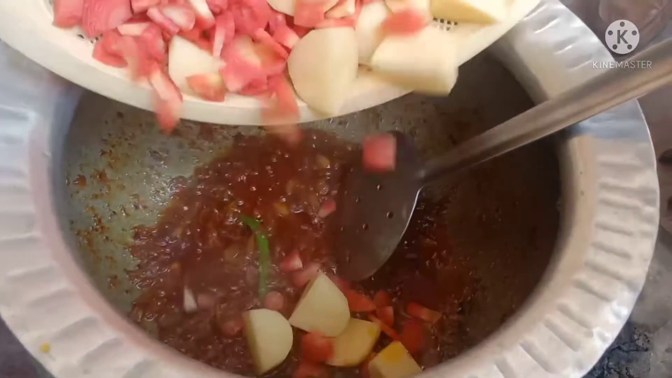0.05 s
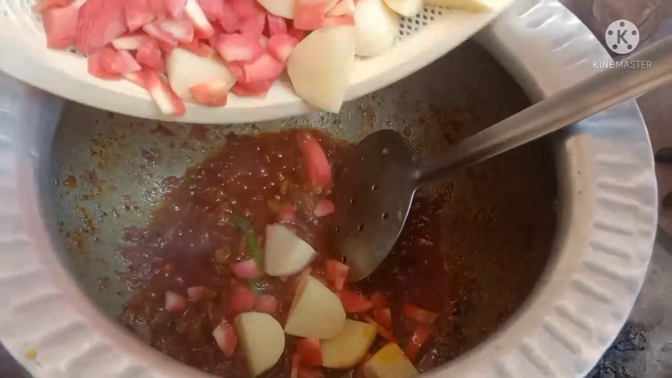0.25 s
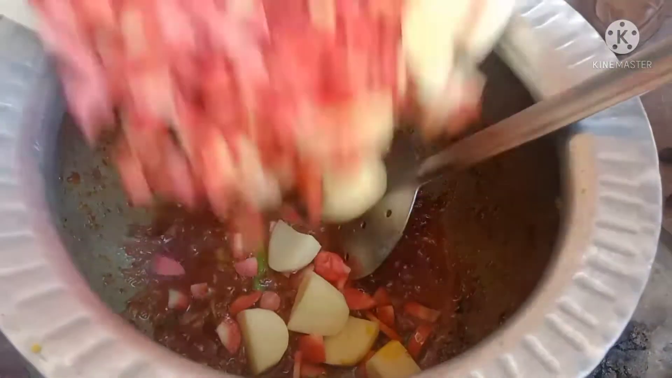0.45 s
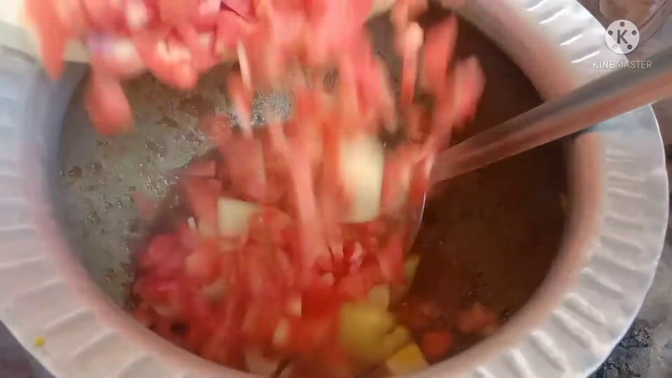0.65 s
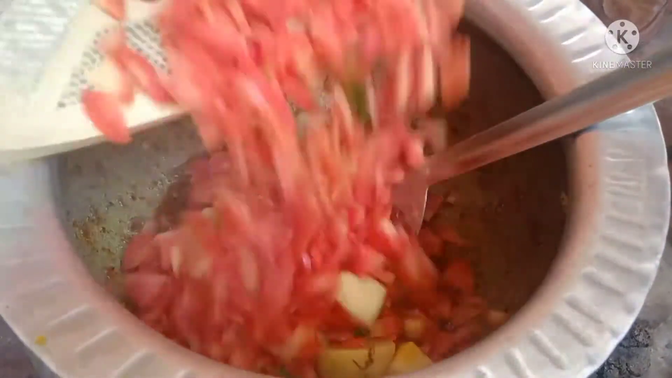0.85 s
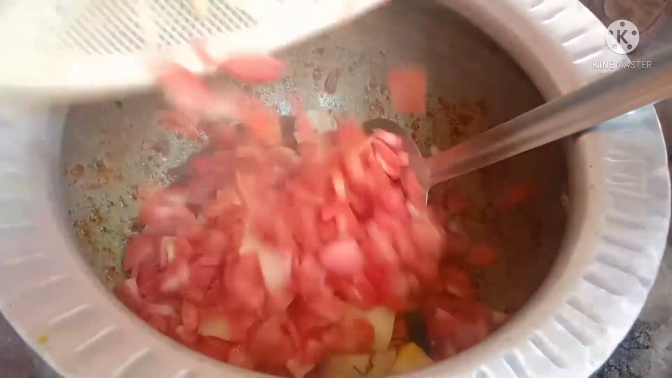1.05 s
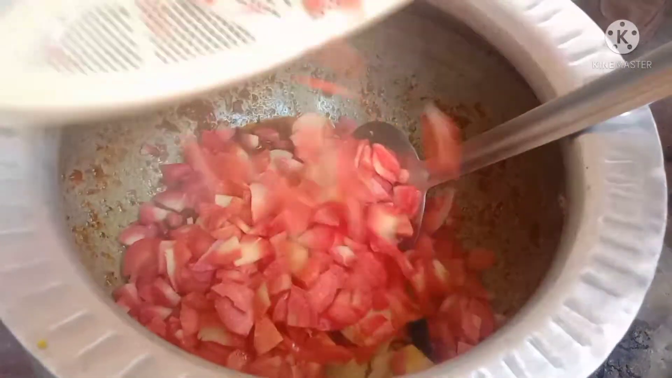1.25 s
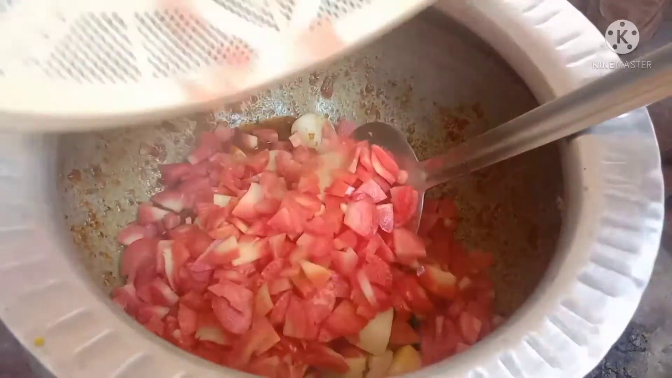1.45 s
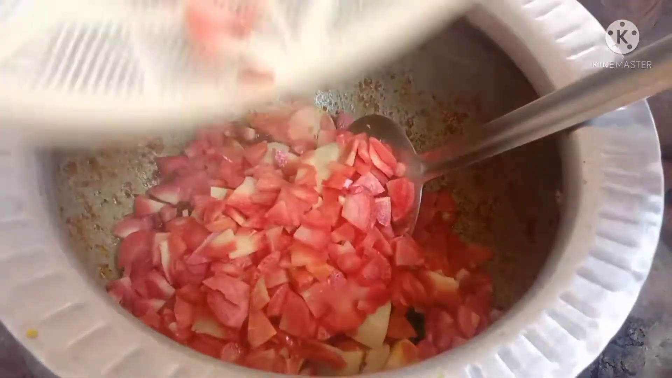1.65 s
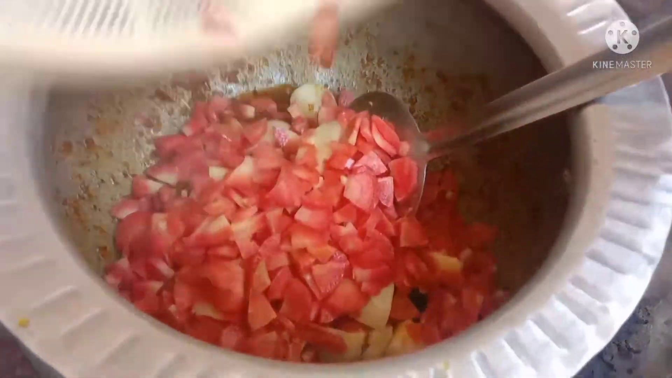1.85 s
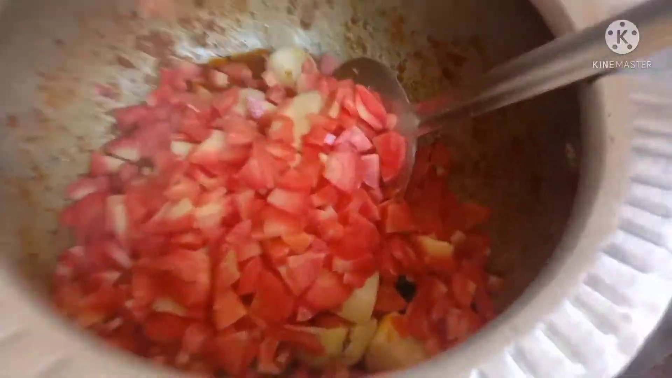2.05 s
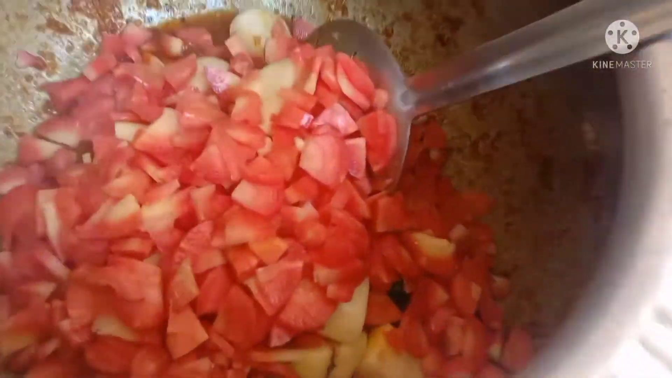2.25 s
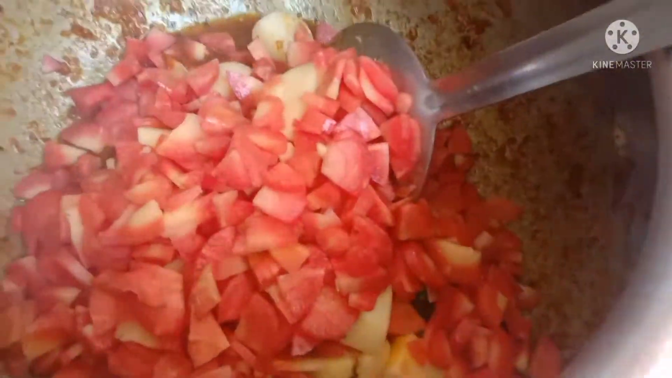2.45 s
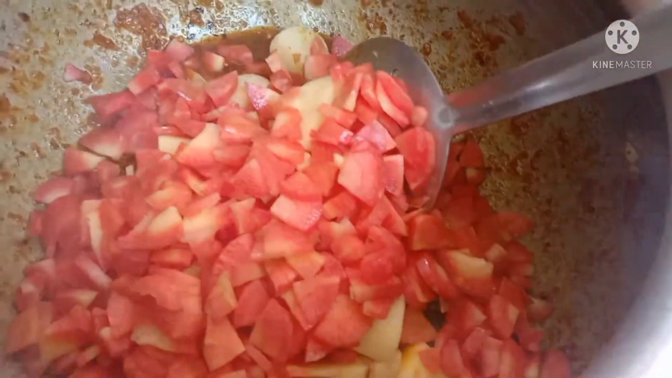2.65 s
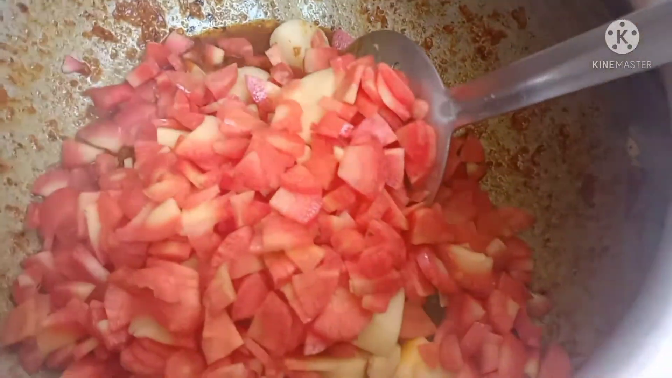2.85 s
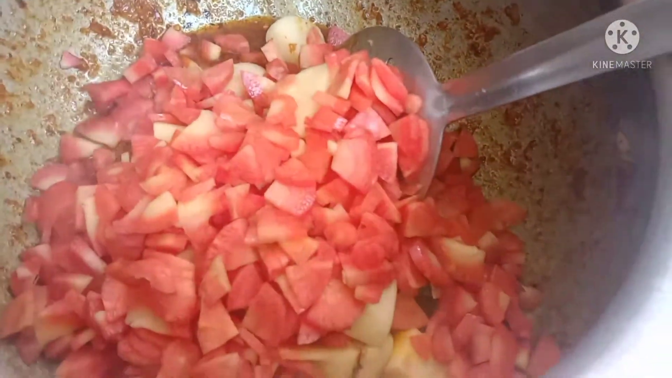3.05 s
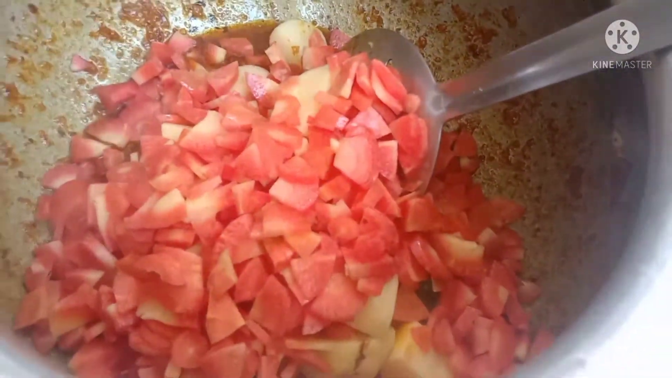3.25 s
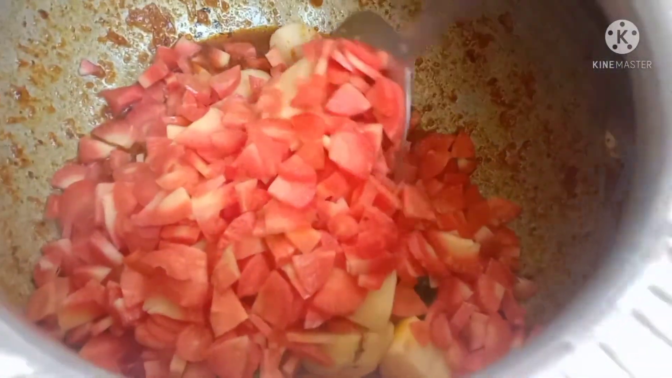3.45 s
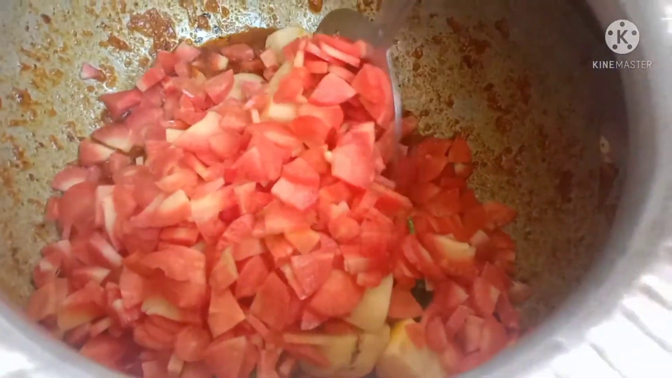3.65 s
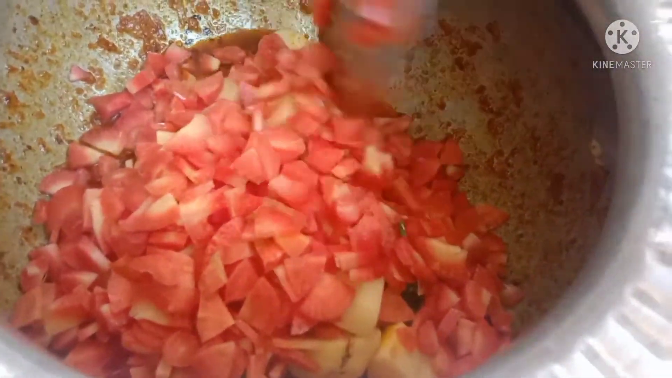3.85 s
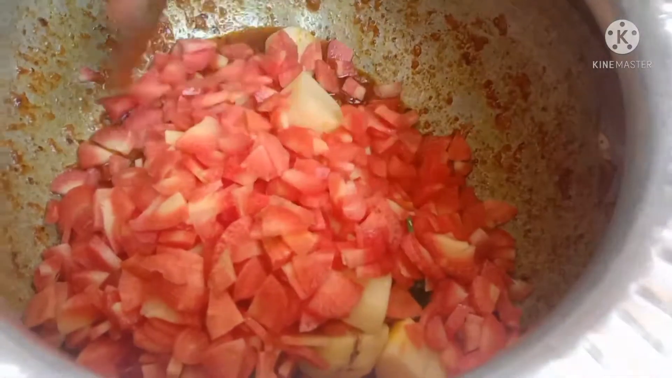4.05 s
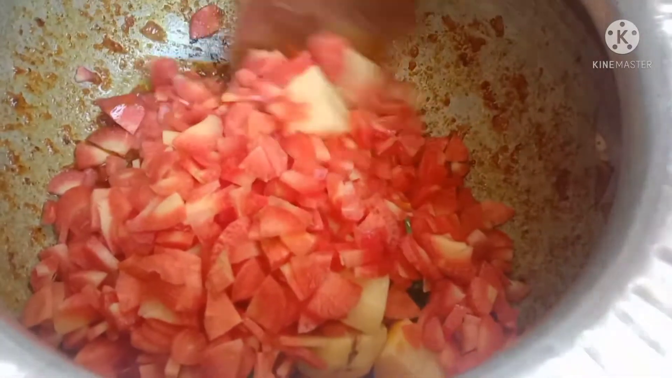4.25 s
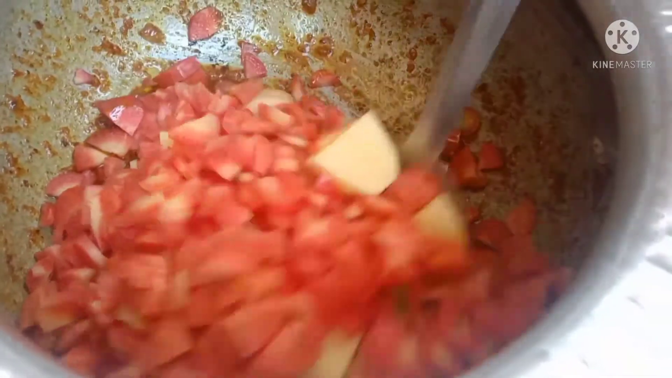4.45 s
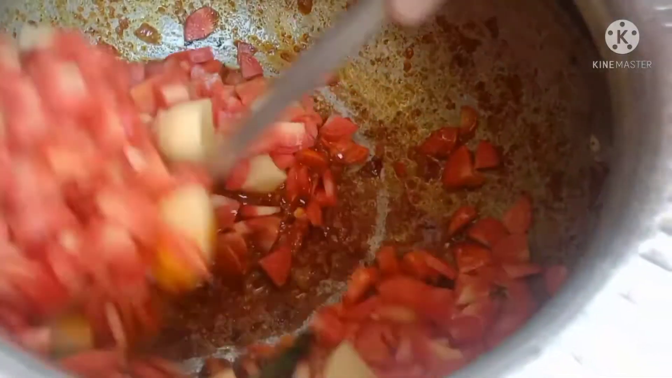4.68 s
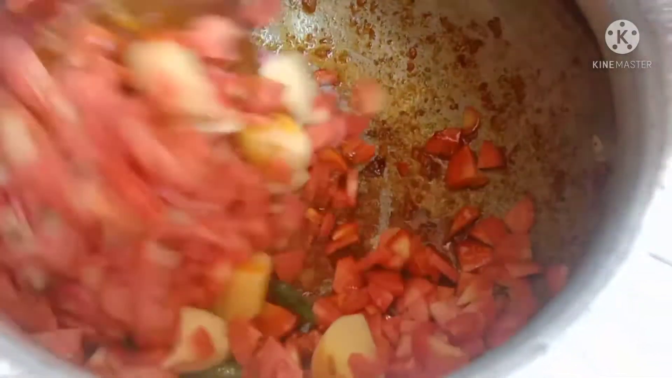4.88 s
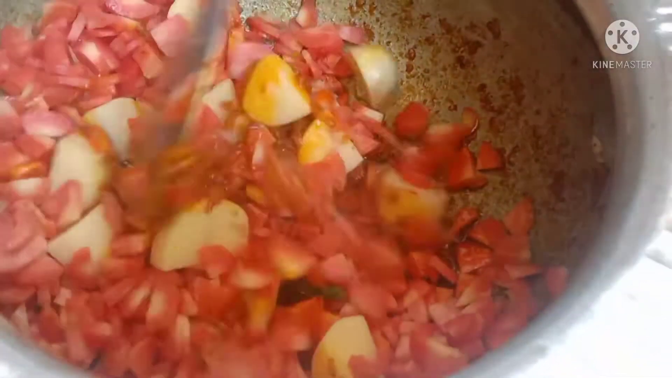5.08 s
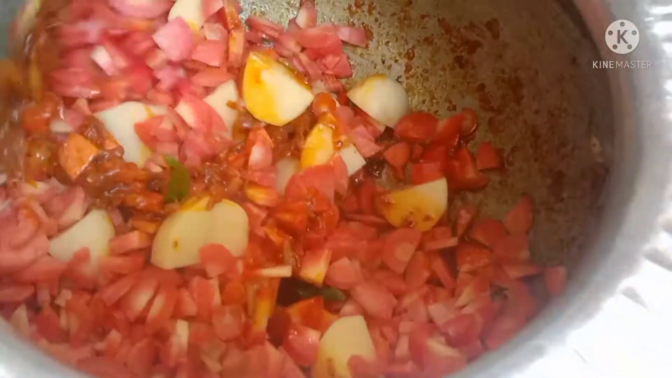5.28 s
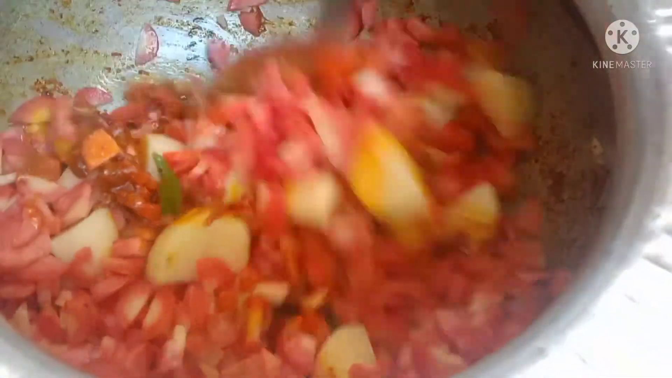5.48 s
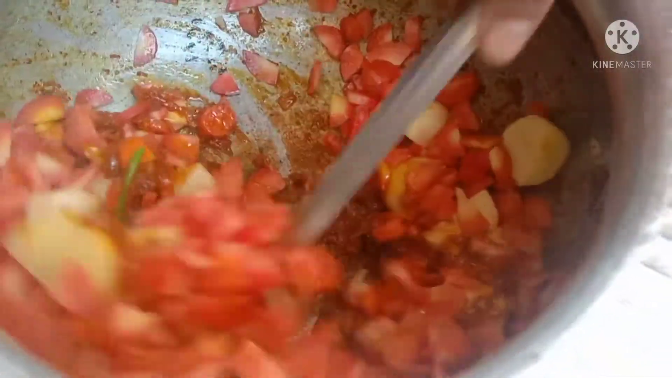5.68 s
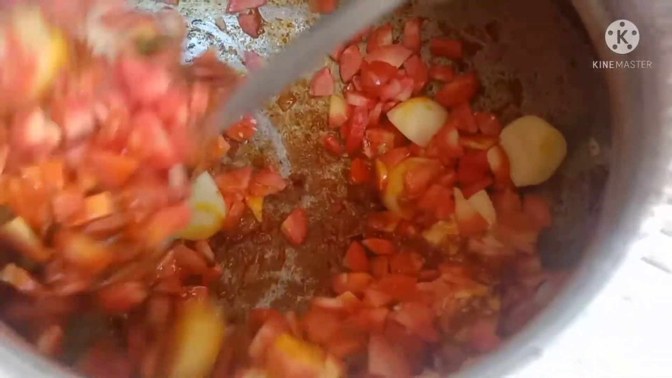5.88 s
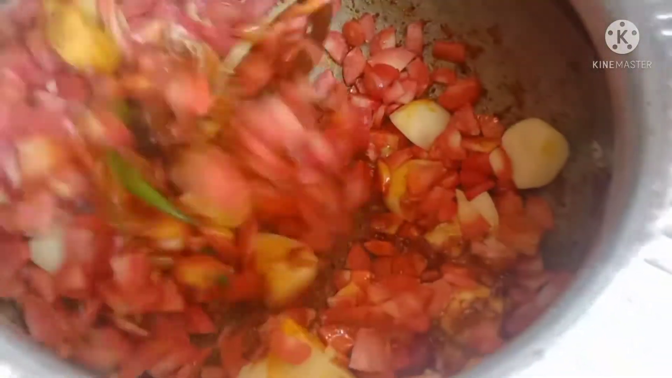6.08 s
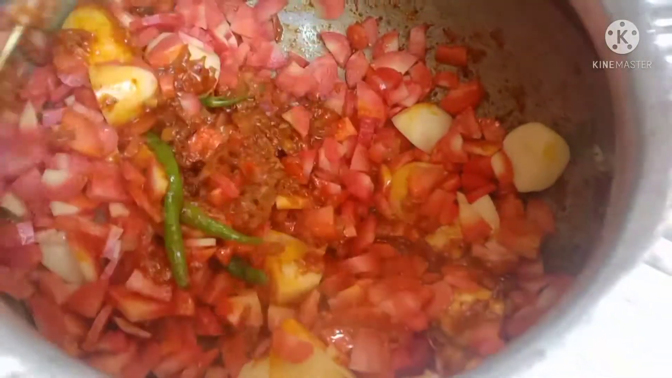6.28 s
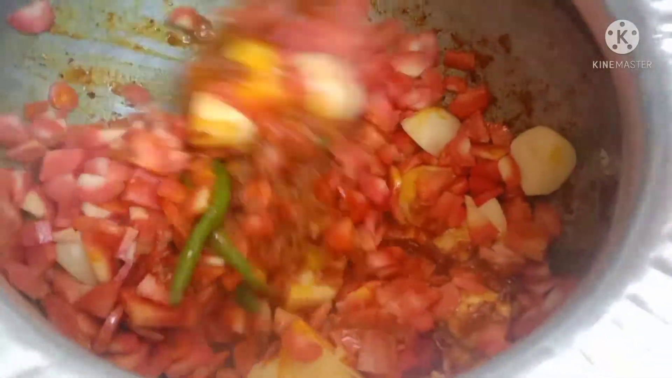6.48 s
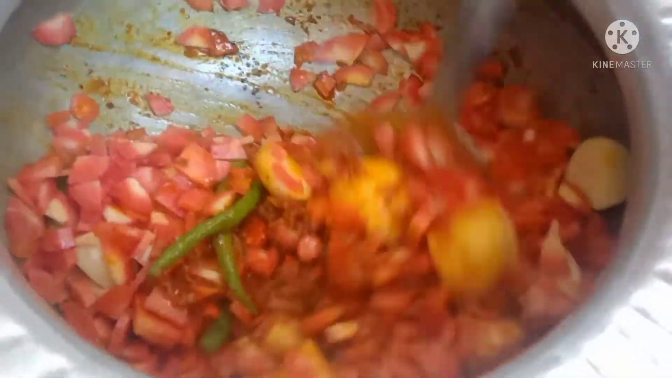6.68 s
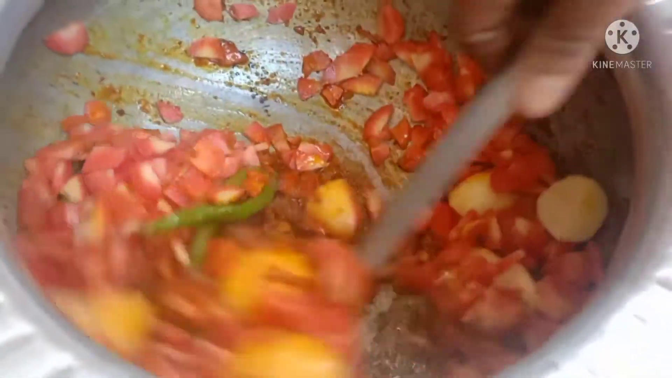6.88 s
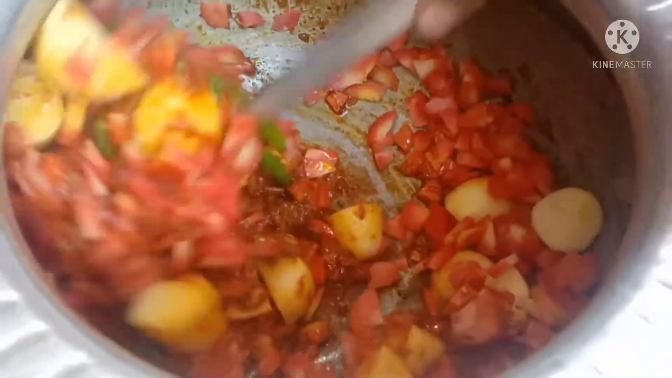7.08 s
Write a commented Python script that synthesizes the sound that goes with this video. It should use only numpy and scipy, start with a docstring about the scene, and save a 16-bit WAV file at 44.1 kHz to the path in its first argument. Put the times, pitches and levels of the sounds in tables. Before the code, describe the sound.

Close above a hot metal pot, quiet frying hiss underlies a few plinks, then a rush of chopped vegetables with hard metallic clanks. A hand taps the colander in steady cracks. The sizzle continues through a calmer pause, then a steel skimmer slides, knocks and stirs with gritty, wet scraping as the frying grows louder. Thin phone-like sound with little bass.

```python
"""Frying sauce sizzles in a wide metal pot, louder later on, as chopped vegetables tumble in from a colander.
Soft landings and hard knocks crack and ring the pot and a steel skimmer leaning in it: each is a sum of dying sines.
A hand taps the colander empty, and the taps jolt the skimmer blade. Gritty noise and plops follow sliding pieces.
The skimmer drags with gliding tones, slides along the wall in friction-fed narrow tones, knocks and stirs.
A phone above the pot loses the bass and limits the peaks, looking a moment ahead."""
import sys
import numpy as np
from scipy import signal
from scipy.io import wavfile
from scipy.ndimage import uniform_filter1d, minimum_filter1d

SR = 44100
rng = np.random.default_rng(int(sys.argv[2]) if len(sys.argv) > 2 else 0)


def store_pcm(level_fs):
    """Save levels as 16-bit WAV."""
    pcm = np.round(np.clip(level_fs, -1, 1) * 32767).astype(np.int16)
    wavfile.write(sys.argv[1], SR, np.atleast_2d(pcm).T)


N = 313992

# sizzle of the frying oil: (time [s], hiss level [dB])
FRYING_LEVELS = [(0.0, -44), (0.55, -40.5), (0.75, -41), (1.39, -42), (2.06, -35), (3.39, -39),
                 (3.86, -40.5), (4.32, -31.5), (4.6, -32), (5.02, -29), (5.3, -32), (5.53, -27.5),
                 (5.89, -29), (6.55, -28.5), (6.86, -28.5), (7.12, -29.5)]
# colour of the sizzle: (frequency [Hz], density [dB per Hz])
HISS_SPECTRUM = [(60, -10), (180, -20), (340, -17), (700, -59), (1100, -38), (2000, -15.5), (3000, -1),
                 (3700, -2.5), (4300, -57), (5100, 0), (7200, 2), (8300, -8), (11000, -9), (15700, -6.5)]
# colour of gritty rubbing: (frequency [Hz], density [dB per Hz])
RASP_SPECTRUM = [(200, -15.5), (500, 2.5), (700, -7.5), (900, -8), (1800, -4.5), (2100, -7), (3200, 1),
                 (4200, -12.5), (5200, -4), (7200, -5), (8300, -15.5), (12000, -19.5), (15700, -12)]
# spitting sauce, a row each for hollow, wall, skimmer, grit, rasp:
# (level at a hiss of -29.5 dB [dB], gain per dB of hiss [dB])
SPITTING_SAUCE = [(-62, 0.63), (-61, 0.04), (-52.5, 1.4), (-37, 2.04), (-33.5, 2)]
# plops as heard inside the pot: (frequency [Hz], density [dB per Hz])
PLOP_SPECTRUM = [(300, -4), (480, 0.5), (660, -14), (850, -3), (1200, -4), (2300, -9), (4000, -29)]
# hard pieces and steel: (time [s], crack [dB], pot hollow [dB], pot wall [dB],
# skimmer handle [dB], skimmer blade [dB])
HARD_KNOCKS = [(0.0024, -26.5, -24.5, -33, -22.5, -28.5), (0.492, -20, -19, -31, -11, -21),
               (0.5207, 0, -34, -28.5, -14.5, -12), (0.9363, -13, -30, -27, -18, -21.5),
               (2.1274, -16.5, -46, -27, -11, -19), (2.4932, -32, -57, -60, -72, -39),
               (3.9191, -38, -48, -43, -61, -57), (4.122, -10, -13.5, -17, -15.5, -18),
               (4.8423, -29, -45, -31, -50, -50), (5.0527, -22, -22, -30.5, -36.5, -41),
               (5.2302, 2.5, -17, -22, -9, -13.5), (5.477, -14, -49, -43, -48, -25),
               (5.5184, -11, -40, -42, -49, -22.5), (6.5065, -6.5, -9.5, -20.5, -18, -18),
               (6.8529, -21, -51, -17.5, -27, -31)]
# vegetables landing softly: (time [s], crack [dB], pot hollow [dB], skimmer handle [dB], skimmer blade [dB])
SOFT_LANDINGS = [(0.1208, -38, -50, -48, -56), (0.1591, -40, -22, -38.5, -48),
                 (0.181, -9.5, -34, -14.5, -16.5), (0.199, -14, -32.5, -22, -16),
                 (0.3122, -33.5, -41.5, -28, -30.5), (0.4509, -61, -22.5, -34, -37.5),
                 (0.4742, -46, -19.5, -34, -45), (0.6533, -15, -27.5, -14, -19.5),
                 (0.6692, -20, -35, -19, -35), (0.696, -32, -30.5, -54, -23),
                 (0.8219, -24, -35.5, -24, -23.5), (0.8526, -12, -56, -25, -25),
                 (0.974, -24, -38, -24.5, -27.5), (1.0461, -21.5, -37, -53, -53),
                 (1.1893, -19.5, -30, -24, -34), (1.4165, -25, -42, -39, -38), (2.0242, -42, -60, -62, -40),
                 (2.3194, -43, -42.5, -56, -39), (2.53, -53, -44, -59, -56),
                 (3.272, -52, -53, -46.5, -37.5), (3.551, -50, -49.5, -70, -48),
                 (4.0857, -19.5, -45, -34.5, -55), (4.3884, -28, -41, -39, -36),
                 (5.3401, -16.5, -29, -24, -39), (5.3599, -10, -29, -24, -34), (6.374, -40, -45, -49, -50)]
# a hand on the colander: (time [s], crack [dB], skimmer handle [dB], skimmer blade [dB])
COLANDER_TAPS = [(1.1419, -4.5, -18.5, -14.5), (1.333, -8.5, -19.5, -15.5), (1.5167, -6.5, -19, -19.5),
                 (1.699, -9.5, -23.5, -14), (1.8875, -9, -20, -24), (2.0965, -15, -24, -23.5)]
# colour of every crack: (frequency [Hz], density [dB per Hz])
CRACK_SPECTRUM = [(200, -30), (500, -9), (1800, -10), (3200, 4), (4200, -8.5), (5200, 4), (7200, 0.5),
                  (8300, -13), (15700, -15.5)]
# air in the pot: (frequency [Hz], relative level [dB], t60 [s])
HOLLOW_MODES = [(250, -7.5, 0.57), (309.4, -5.5, 0.57), (330, 21, 0.19), (364, 17.5, 0.21),
                (400.6, 9.5, 0.12), (467, 17, 0.054), (500, 1, 0.047), (569, 9.5, 0.13)]
# pot wall: (frequency [Hz], relative level [dB], t60 [s])
WALL_MODES = [(816.7, 5.5, 0.15), (867, -1, 0.022), (940, 10, 0.033), (1040, 6.5, 0.11)]
# skimmer handle pitches: (frequency [Hz])
HANDLE_PITCHES = [1342, 1553, 1600, 1684, 1717, 1814, 1863]
# skimmer handle at those pitches: (relative level [dB], t60 before damping [s])
HANDLE_MODES = [(-15, .55), (-7, .2), (0, .3), (-11, .22), (-15, .18), (-20, .45), (-13, .28)]
# skimmer blade pitches: (frequency [Hz])
BLADE_PITCHES = [2165, 2436, 2503, 2542, 2570, 2684, 2744, 2899, 3148, 3166, 3325, 3553, 3810]
# skimmer blade at those pitches: (relative level [dB], t60 before damping [s])
BLADE_MODES = [(-14, .2), (-3, .22), (-9, .22), (-6, .18), (-8, .2), (-7, .15), (0, .22), (-2, .24),
               (-3, .2), (-5, .14), (-5, .22), (-11, .2), (-9, .25)]
# a tap jolts the blade through the pot, a value for each blade mode: (level change [dB])
JOLT_CHANGES = [-2, 2, 6, 3, 1, -11, -8, -57, -0.5, -18, -5, 0, 3]
# vegetables sliding into the pot: (start [s], length [s], pot [dB], skimmer [dB], rasp [dB])
VEGETABLE_POURS = [(0.207, 0.13, -44.5, -65, -42), (0.538, .17, -35.5, -28.5, -34.5),
                   (0.704, 0.13, -37, -39.5, -37), (0.814, 0.15, -39, -35, -33.5),
                   (0.973, 0.12, -38, -39, -35.5), (2.206, 0.21, -64, -50, -56)]
# skimmer strokes through the vegetables: (start [s], length [s], pot [dB], skimmer [dB], rasp [dB])
SKIMMER_STROKES = [(3.636, .4, -87, -60, -42.5), (4.149, 0.065, -29, -34, -20),
                   (4.196, 0.045, -27.5, -27.5, -21), (4.262, .04, -28, -30.5, -23),
                   (4.34, 0.44, -33.5, -42, -41), (4.524, 0.17, -34, -34, -26.5),
                   (4.777, 0.11, -39.5, -43, -40), (5.059, 0.074, -50.5, -49, -34.5),
                   (5.332, 0.15, -28, -30.5, -24), (5.49, 0.18, -29.5, -36, -35),
                   (5.603, 0.083, -35, -31.5, -27), (5.668, 0.076, -25.5, -36, -28.5),
                   (5.83, 0.065, -49, -66, -71), (5.94, 0.037, -45.5, -45, -48),
                   (6.048, 0.036, -39, -49, -46), (6.497, 0.24, -31, -40.5, -53),
                   (6.785, 0.19, -33.5, -32, -27), (6.914, 0.13, -24.5, -36, -34.5)]
# steel over the wet bottom; narrow tones whistle, wide ones are rough:
# (start [s], length [s], level [dB], first pitch [Hz], last pitch [Hz], width of each of two filter stages [Hz])
BOTTOM_DRAGS = [(2.755, 0.098, -52, 650, 576, 50), (4.517, 0.31, -32.5, 1052, 810, 205),
                (5.601, 0.2, -28.5, 1030, 934, 201), (5.93, 0.14, -50, 1565, 1720, 50),
                (6.42, 0.085, -41, 1600, 1640, 50), (4.2, 0.094, -23.5, 1847, 1840, 40),
                (6.12, 0.19, -41.5, 945, 877, 40), (6.768, 0.19, -26.5, 1150, 890, 206),
                (7.0, 0.071, -29, 938, 912, 78)]
# skimmer edge gliding on the wall: (time [s], level [dB])
SLIDE_LEVELS = [(3.62, -76), (3.656, -36), (3.788, -34.5), (3.94, -46.5), (4.008, -35.5), (4.054, -41),
                (4.12, -25.5)]
# skimmer tones while gliding: (frequency [Hz], width before sharpening [Hz], relative level [dB])
EDGE_TONES = [(1230, 60, -12), (2200, 36, -10), (2910, 43, -9), (3320, 50, -7), (3570, 30, -11),
              (4040, 30, -15), (4440, 27, -10), (5060, 35, -8), (5200, 40, -9), (5520, 41, -9),
              (6700, 32, 0), (6950, 30, -4), (7320, 37, -11), (7720, 30, -12), (8830, 35, -15),
              (9900, 40, -14), (12100, 42, -11), (14200, 40, -15)]

BAND_LIMIT_HZ = 15680
WALL_FOLLOWS_CRACK, LANDING_WALL_DB = 0.5, -6  # a landing rings the wall between pot and crack
PUSH_BELOW_POT_DB, TAP_PUSH_DB = -22.5, -28  # low push: relative to the pot hollow; level for a tap
TAP_POT_DB, TAP_WALL_DB = -12.5, -11  # pot hollow and wall relative to the tap's crack
TUMBLE_S, TUMBLE_DB = 0.11, (-39.5, -38.5, -37.5)  # pieces shaken loose by a tap: pot, skimmer, rasp
PRESS_S, LIFT_S = 0.031, 0.042  # rise and fading time constant of any sliding movement
RUB_WALL_FOLLOWS_RASP, RUB_WALL_DB = 0.28, -1.5
GRIT_FOLLOWS_RASP, GRIT_DB = 0.81, -1.5
DRAG_PEAK, DRAG_FADE_DB = 0.19, -13.5  # share of the stroke where fading begins; fall to the end
HANDLE_DAMPING, BLADE_DAMPING = 0.72, 0.82  # sauce and vegetables shorten the rings by these factors
GLIDE_SHARPNESS = 3.1  # light contact damps the gliding tones less
LUMPS_PER_S, LUMP_HZ, LUMP_CYCLES, LUMP_DB = 260, (401, 2280), 9.2, -5.5  # level is relative to wall rubbing


def gain_of(db):
    """Amplitude factor of a level in dB."""
    return 10 ** (np.asarray(db) / 20)


def evened(x):
    """Sound scaled to unit power."""
    return x / np.sqrt(np.mean(x ** 2) + 1e-20)


def band(x, lo_hz, hi_hz, order=2):
    """Butterworth band-pass."""
    return signal.sosfilt(signal.butter(order, [lo_hz, hi_hz], "band", fs=SR, output="sos"), x)


def curves(rows):
    """Columns of a timed table, one value a sample."""
    s, *columns = np.transpose(rows)
    return [np.interp(np.arange(N) / SR, s, c) for c in columns]


def coloured(x, points):
    """Causal minimum-phase filter of unit energy, shaped like the given spectrum."""
    f, db = np.transpose(points)
    hz = abs(np.fft.fftfreq(4096, 1 / SR))
    curve_db = np.interp(np.log(hz + 1), np.log(f), np.maximum(db, -80))
    log_gain = curve_db * np.log(10) / 20
    taps = np.fft.ifft(np.exp(np.conj(signal.hilbert(log_gain)))).real[:2048]
    return signal.oaconvolve(x, taps / np.linalg.norm(taps))[:N]


def ringing(modes, length=SR):
    """Impulse response of a body: a sum of dying sines."""
    t = np.arange(length) / SR
    return sum(gain_of(db - 60 * t / t60) * np.sin(2 * np.pi * hz * t) for hz, db, t60 in modes)


def grains(per_s, spread_db, blur):
    """Clicks of uneven size over a share of smooth noise, unit power."""
    happens = rng.random(N) < per_s / SR
    size = gain_of(spread_db * np.minimum(rng.exponential(1, N), 3.5)) * happens
    clicks = evened(size * rng.standard_normal(N))
    return evened(clicks + blur * rng.standard_normal(N))


def waver(hz, db):
    """Random slow gain: low-passed noise as a level in dB."""
    lowpass = signal.butter(2, hz, fs=SR, output="sos")
    slow = signal.sosfilt(lowpass, rng.standard_normal(N + SR))
    return gain_of(db * evened(slow[SR:]))  # the first second lets the filter settle


def patchy(x, patchy_db):
    """Narrow tones swell and fade at random, a few dozen hertz wide and some 50 ms long."""
    z = signal.stft(x, nperseg=1024, noverlap=768)[2]
    patches = uniform_filter1d(rng.standard_normal(z.shape), size=7, axis=1)
    patches = uniform_filter1d(patches, size=2, axis=0)
    z = z * gain_of(patchy_db * evened(patches))
    return evened(signal.istft(z, nperseg=1024, noverlap=768)[1][:N])


def movement(start, length):
    """Rise, hold and fading of one sliding movement."""
    t = np.arange(N) / SR - start
    return np.clip(t / PRESS_S, 0, 1) ** 2 * np.exp(-np.maximum(t - length, 0) / LIFT_S)


def rubbing():
    """Levels in dB on hollow, wall, skimmer, grit and bright rasp: movements add power to the spitting sauce."""
    hiss_db, = curves(FRYING_LEVELS)
    power = gain_of([db + slope * (hiss_db + 29.5) for db, slope in SPITTING_SAUCE]) ** 2
    tumbles = [(tap[0], TUMBLE_S, *TUMBLE_DB) for tap in COLANDER_TAPS]
    for start, length, pot, skimmer, bright in VEGETABLE_POURS + tumbles + SKIMMER_STROKES:
        wall = pot + RUB_WALL_FOLLOWS_RASP * (bright - pot) + RUB_WALL_DB
        grit = pot + GRIT_FOLLOWS_RASP * (bright - pot) + GRIT_DB
        gains = gain_of([[pot], [wall], [skimmer], [grit], [bright]])
        power = power + (gains * movement(start, length)) ** 2
    return 10 * np.log10(power)


def all_blows():
    """Rows (time [s], then crack, low push, pot hollow, pot wall, skimmer handle, skimmer blade [dB])."""
    taps = [(s, crack, TAP_PUSH_DB, crack + TAP_POT_DB, crack + TAP_WALL_DB, handle, blade)
            for s, crack, handle, blade in COLANDER_TAPS]
    knocks = [(s, crack, pot + PUSH_BELOW_POT_DB, pot, wall, handle, blade)
              for s, crack, pot, wall, handle, blade in HARD_KNOCKS]
    landings = [(s, crack, pot + PUSH_BELOW_POT_DB, pot,
                 pot + WALL_FOLLOWS_CRACK * (crack - pot) + LANDING_WALL_DB, handle, blade)
                for s, crack, pot, handle, blade in SOFT_LANDINGS]
    return taps + knocks + landings


def contacts(levels_db, t60, body):
    """Rough force at each blow, sized by the peak of the body's answer; soft landings rise slowly."""
    t, force = np.arange(8000) / SR, np.zeros(N + 8000)
    rough = rng.standard_normal((len(levels_db), len(t)))
    rises_s = [.0003] * len(COLANDER_TAPS + HARD_KNOCKS) + [.004] * len(SOFT_LANDINGS)
    for row, db, burst, rise in zip(all_blows(), levels_db, rough, rises_s):
        at = round(row[0] * SR)
        burst = burst * (1 - np.exp(-t / rise)) * gain_of(-60 * t / (t60 + 9 * rise))
        answer = signal.fftconvolve(burst[:3000], body[:3000])
        peak = np.sqrt(uniform_filter1d(answer ** 2, size=300).max())  # loudest 7 ms
        force[at:at + len(t)] += gain_of(db) * burst / peak
    return force[:N]


def struck(modes, blows_db, rub_db, contact_t60, rub_per_s, damping):
    """One body, rung by single blows and by the patter of rubbing, whose rings are shorter."""
    ring = ringing(modes)
    damped = ringing([(hz, db, t60 * damping) for hz, db, t60 in modes])
    rub = gain_of(rub_db) * waver(25, 2.5) * grains(rub_per_s, 3., .8) / np.linalg.norm(damped)
    blows = signal.oaconvolve(contacts(blows_db, contact_t60, ring), ring)[:N]
    patter = signal.oaconvolve(rub, damped)[:N]
    return band(blows + patter, modes[0][0] * 0.97, modes[-1][0] * 0.935)


def sizzle():
    """Thousands of bursting bubbles a second, coloured by the pot."""
    hiss_db, = curves(FRYING_LEVELS)
    bubbles = patchy(grains(5000, 1.4, 2.5), 3.8) * waver(37, 0.32)
    return gain_of(hiss_db) * coloured(bubbles, HISS_SPECTRUM)


def rasp():
    """Wide gritty, wet noise of pieces and steel over the pot; each range follows the part that is rubbed."""
    hollow, wall, skimmer, middle, bright = gain_of(rubbing())
    grit = coloured(patchy(grains(2000, 2.5, .9), 4.) * waver(30, 2.), RASP_SPECTRUM)
    rumble = band(rng.standard_normal(N), 92, 167) * waver(22, 0.97)
    ranges = [(398, 1640, wall / gain_of(6.0)), (1292, 1897, skimmer),
              (1694, 4130, middle), (4040, 21000, bright)]  # low Hz, high Hz, gain
    gritty = sum(evened(band(grit, lo, hi, order=3)) * level for lo, hi, level in ranges)
    return gritty + evened(rumble) * gain_of(-34) * hollow ** 0.61


def lumps():
    """Wet pieces knock together: short damped plops of many pitches, as loud as the wall rubbing lets them."""
    wall_db, t, out = rubbing()[1], np.arange(3000) / SR, np.zeros(N)
    happens = rng.random(N) < LUMPS_PER_S / SR
    size = gain_of(3.5 * np.minimum(rng.exponential(1, N), 3)) * happens
    pitches = np.geomspace(*LUMP_HZ, num=24)
    which = rng.integers(0, len(pitches), N)
    for k, hz in enumerate(pitches):
        plop = hz * t * np.exp(-hz * t * 4 / LUMP_CYCLES) * np.sin(2 * np.pi * hz * t)
        out += signal.oaconvolve(size * (which == k), plop / np.linalg.norm(plop))[:N]
    return gain_of(wall_db + LUMP_DB) * evened(coloured(out, PLOP_SPECTRUM))


def metal():
    """The pot's air hollow and wall, and the skimmer's handle and blade, each ring in their own modes."""
    _, _, _, hollow, wall, handle, blade = np.transpose(all_blows())
    is_tap = np.arange(len(blade)) < len(COLANDER_TAPS)
    blade = np.where(is_tap, -np.inf, blade)  # jolts() rings the blade for taps
    rub_hollow, rub_wall, rub_skimmer, _, _ = rubbing()
    handle_modes = np.column_stack([HANDLE_PITCHES, HANDLE_MODES]) * [1, 1, HANDLE_DAMPING]
    blade_modes = np.column_stack([BLADE_PITCHES, BLADE_MODES]) * [1, 1, BLADE_DAMPING]
    return (struck(HOLLOW_MODES, hollow, rub_hollow, 0.019, 600, 0.63)
            + struck(WALL_MODES, wall, rub_wall - 3., 0.016, 500, 0.61)
            + struck(handle_modes, handle, rub_skimmer, 0.0037, 500, 0.59)
            + struck(blade_modes, blade, rub_skimmer - 1.5, 0.0015, 560, 0.38))


def cracks():
    """Every blow is a tick and a wide crack, then a fading rattle of loose pieces and echoes, all noise bursts."""
    crack_db, air = np.transpose(all_blows())[1], np.ones(1)
    tick = contacts(crack_db - 17.5, 0.0013, air)
    crack = contacts(crack_db - 10.0, 0.048, air)
    rattle = contacts(crack_db - 28.5, 0.85, air)
    return coloured(tick + crack + rattle, CRACK_SPECTRUM)


def pushes():
    """Soft low puff of air under every blow, from three low damped modes."""
    puff = ringing([(74, -13, 0.27), (110.4, -3.0, 0.13), (144.5, 0.5, 0.075)], length=6000)
    return signal.oaconvolve(contacts(np.transpose(all_blows())[2], 0.04, puff), puff)[:N]


def jolts():
    """The blade's modes, rebalanced, ring after each tap on the colander."""
    modes = [(hz, db + change_db, t60 * BLADE_DAMPING)
             for hz, (db, t60), change_db in zip(BLADE_PITCHES, BLADE_MODES, JOLT_CHANGES)]
    ring = ringing(modes)
    return signal.oaconvolve(contacts(np.transpose(COLANDER_TAPS)[3], 0.0058, ring), ring)[:N]


def drags():
    """Friction noise rings one resonance that glides as the blade's grip changes."""
    out = np.zeros(N)
    for start, length, db, first_hz, last_hz, width_hz in BOTTOM_DRAGS:
        u = np.arange(0, 1, 1 / (length * SR))  # share of the stroke
        r = np.exp(-np.pi * width_hz / SR)
        slow = [1, 1j] @ rng.standard_normal((2, SR))
        for _ in range(2):  # two low-pass stages set the width of the tone
            slow = signal.lfilter([1 - r], [1, -r], slow)
        glide_hz = first_hz + (last_hz - first_hz) * u
        tone = (slow[:len(u)] * np.exp(2j * np.pi * np.cumsum(glide_hz) / SR)).real
        fade_db = DRAG_FADE_DB * (np.maximum(u - DRAG_PEAK, 0) / (1 - DRAG_PEAK)) ** 2
        at = round(start * SR)
        out[at:at + len(u)] += gain_of(db + fade_db) * evened(tone) * signal.windows.tukey(len(u), .2)
    return out


def slide():
    """Light friction feeds narrow tones of the skimmer, each coming and going."""
    level_db, = curves(SLIDE_LEVELS)
    t = np.arange(N) / SR
    on = (t > SLIDE_LEVELS[0][0]) & (t < SLIDE_LEVELS[-1][0])
    drag = on * gain_of(level_db) * patchy(rng.standard_normal(N), 2.5)
    modes = [(hz, db, GLIDE_SHARPNESS * np.log(1000) / (np.pi * width)) for hz, width, db in EDGE_TONES]
    ring = ringing(modes, length=8000)
    return signal.oaconvolve(drag, ring / np.linalg.norm(ring))[:N]


def scene():
    """All layers summed into one channel."""
    cooking = sizzle() + rasp() + lumps()
    blows = metal() + cracks() + pushes() + jolts()
    return (cooking + blows + drags() + slide())[None]


def record(dry):
    """The small microphone drops the bass; a limiter turns down shortly before each peak; then the band limit."""
    heard = signal.sosfilt(signal.butter(2, 85, "high", fs=SR, output="sos"), dry)
    over_db = np.maximum(20 * np.log10(abs(heard[0]) + 1e-9) + 2.5, 0)  # above a threshold of -2.5 dB
    ahead = round(0.024 * SR)
    fall = np.arange(N) * 610.0 / SR  # recovery of 610 dB a second
    padded = np.append(over_db, np.zeros(ahead))
    over_db = -minimum_filter1d(-padded, ahead + 1)[ahead // 2:][:N]  # highest peak within the look-ahead
    over_db = np.maximum.accumulate(over_db + fall) - fall
    limited = heard / gain_of(.95 * uniform_filter1d(over_db, size=60))
    lowpass = signal.firwin(511, BAND_LIMIT_HZ, window=("kaiser", 9), fs=SR)
    return signal.oaconvolve(limited, lowpass[None], "same")


dry = scene()
out = record(dry)
store_pcm(out)
```